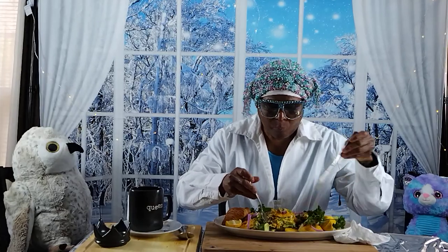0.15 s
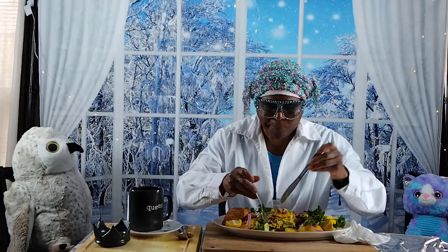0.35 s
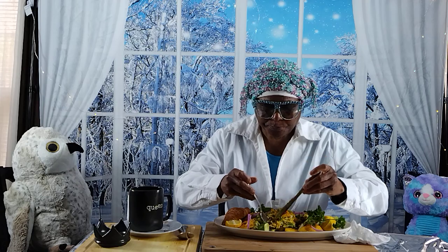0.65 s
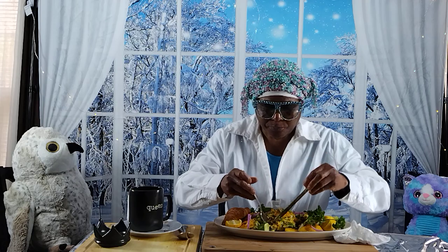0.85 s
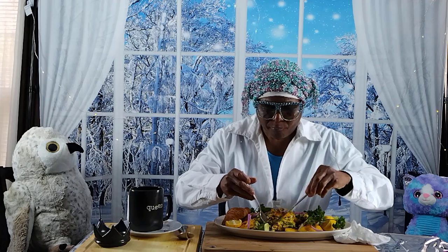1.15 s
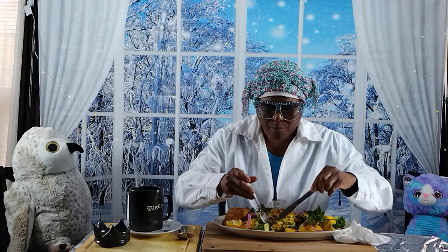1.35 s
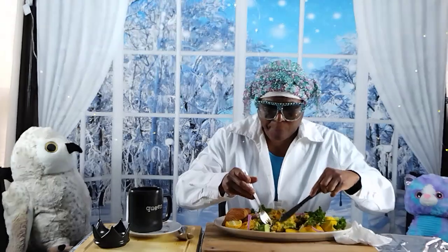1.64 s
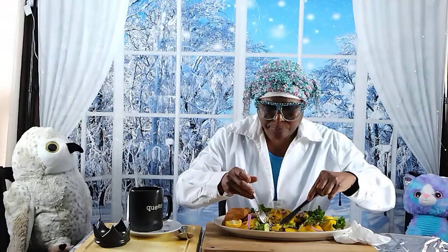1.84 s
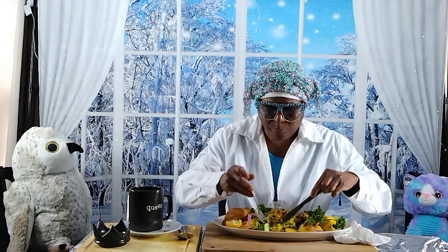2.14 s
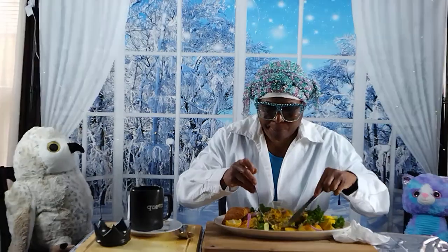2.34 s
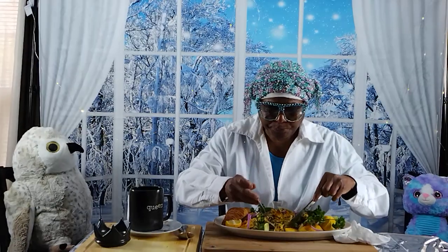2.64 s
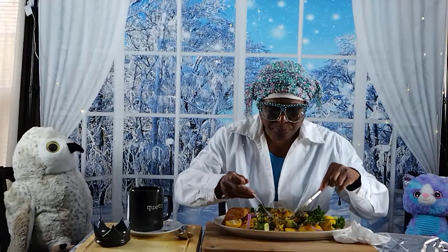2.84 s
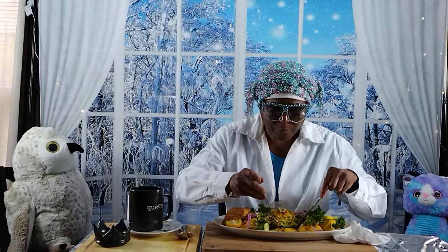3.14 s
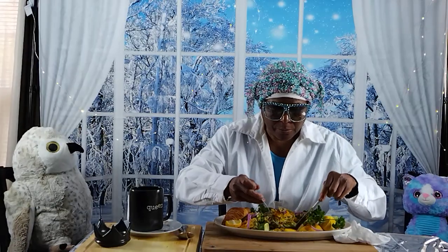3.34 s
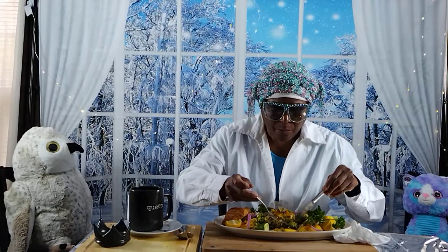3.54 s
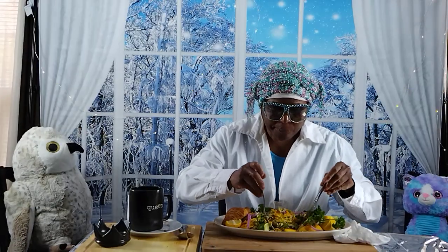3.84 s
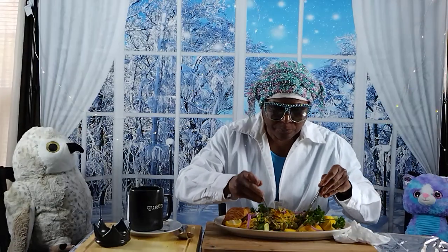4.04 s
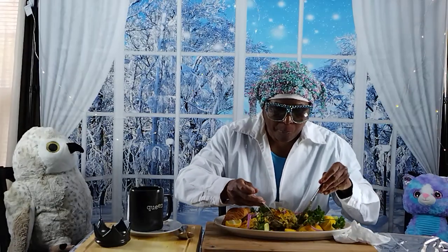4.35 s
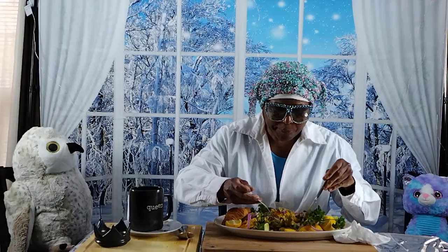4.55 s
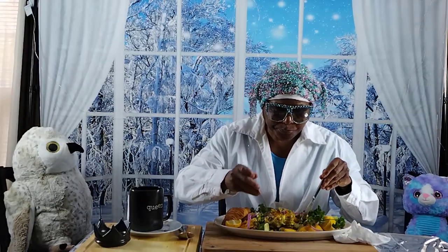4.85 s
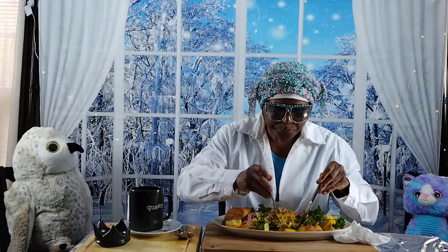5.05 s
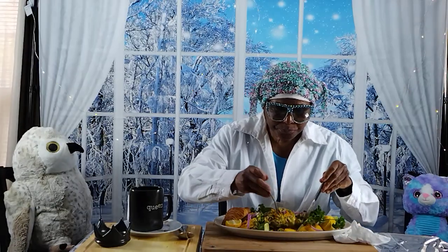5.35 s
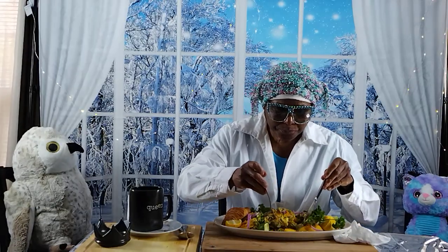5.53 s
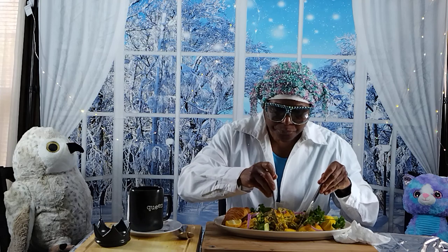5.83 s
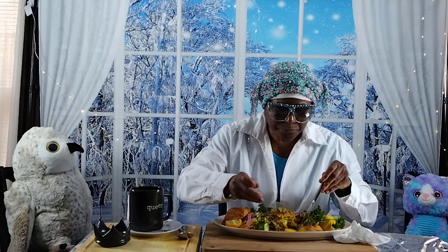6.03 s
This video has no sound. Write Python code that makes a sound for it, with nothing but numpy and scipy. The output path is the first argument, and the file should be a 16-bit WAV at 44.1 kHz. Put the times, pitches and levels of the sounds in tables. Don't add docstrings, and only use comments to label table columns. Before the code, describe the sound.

Knife and fork clink, tap and faintly scrape on a food-laden china plate in a small reverberant room, over a low soft air hush.

```python
import sys
import numpy as np
from scipy import signal
from scipy.fft import rfft, irfft, next_fast_len
from scipy.io import wavfile
from scipy.ndimage import uniform_filter1d, minimum_filter1d

SR = 44100
rng = np.random.default_rng(int(sys.argv[2]) if len(sys.argv) > 2 else 0)


def wav_out(sig):
    wavfile.write(sys.argv[1], SR, np.round(np.clip(np.atleast_2d(sig).T, -1, 1) * 32767).astype(np.int16))


def volts(x):
    e = np.asarray(x, float) / 20
    return 10 ** e


N = 272934
SPAN = 2 ** 15
HZ = np.fft.rfftfreq(SPAN, 1 / SR)
STEADY_TOP_HZ = 14350


# [f/Hz, bandwidth/Hz, level/dB]
RIM = [(270, 180, -27.5), (373, 40, -16.0), (950, 31, -17.5), (522, 120, -18.5), (1147, 18, -17.0),
       (1674, 71, -10.5), (2008, 57, -13.5), (2256, 66, -13.5), (2498, 52.2, -11.0), (3023, 37, -2.5),
       (3584, 24.2, -9.0), (3820, 38, -8.0), (4380, 39, -13.0), (4616, 19, -15.0), (4930, 45, -22.0),
       (5370, 55, -19.5), (6120, 25, -20.5), (6550, 36, -17.5), (6387, 35, -17.5), (7110, 160, -16),
       (8610, 32.15, -30.5), (9320, 38.3, -15), (10170, 67, -29), (10874, 97, -26.5), (11490, 83, -38.5),
       (12900, 71.7, -44), (13710, 52, -35.5)]
# [t/s, peak level/dB, left-right/dB, contact/ms]
RIM_BLOWS = [
    (2.5771, -40, -2.5, 0.73),
    (2.5784, -18.5, -1, 2.46),
    (2.5895, -26, -4.5, 6.8),
]
# [f/Hz, bandwidth/Hz, level/dB]
RIM_DIPS = [(5000, 242, -9.5), (8500, 538, -16), (10540, 300, -4), (12000, 900, -31)]


def rim(out, space):
    strike(out, space, RIM, RIM_BLOWS, RIM_DIPS, damp_hz=70, click_db=-40, low_hz=230, high_hz=19000, room_db=5.5)


# [f/Hz, bandwidth/Hz, level/dB]
BASE = [(274, 26, -9.5), (510, 17, -18.5), (808, 19, -1.0), (1177, 29, -0.5), (1334, 23, 1.5),
        (1520, 31, -0.5), (1740, 28, 2), (2274, 36, 7.5), (2316, 15.0, 4.5), (2510, 17, 1.0),
        (3073, 107, -2), (4060, 210, -10), (5270, 62, -13.5), (5960, 14, -7.5), (7600, 140, -21),
        (8150, 62, -52), (10040, 37, -21.5)]
# [t/s, peak level/dB, left-right/dB, contact/ms]
BASE_BLOWS = [(4.066, -25, -0.5, 2.2)]
# [f/Hz, bandwidth/Hz, level/dB]
BASE_DIPS = [(4700, 260, 7.5), (6860, 230, -14), (9100, 500, -18), (11800, 1900, -26)]


def base(out, space):
    strike(out, space, BASE, BASE_BLOWS, BASE_DIPS, damp_hz=50, click_db=-44, low_hz=230, high_hz=8500, room_db=3.1)


# [f/Hz, bandwidth/Hz, level/dB]
DIPS = [(4550, 250, -19), (8150, 500, -16), (10000, 293.5, -7), (12300, 349, -4)]
# [f/Hz, bandwidth/Hz, level/dB]
TINES = [(1850, 30, 12.5), (2777, 15, -1), (2890, 47, -8.5), (3940, 22, -7.5), (5500, 740, -15.5),
         (7100, 120, -1.5), (8800, 220, -6), (10000, 82, -5.5), (11200, 71, -9), (10770, 24, -7),
         (11700, 57, -10), (12000, 56, -41), (13540, 230, -7.5)]
# [t/s, peak level/dB, left-right/dB, contact/ms]
TINE_BLOWS = [(5.209, -43.5, 1, 4.2), (5.886, -34.5, 2.6, 1.23)]


def tines(out, space):
    strike(out, space, TINES, TINE_BLOWS, DIPS, damp_hz=50, click_db=-28, low_hz=1500, high_hz=17000, room_db=3.2)


# [f/Hz, bandwidth/Hz, level/dB]
NUDGE = [(1900, 67, 1), (2700, 83, -3), (3750, 100, -20), (5760, 300, -17), (6900, 140, -7),
         (8900, 500, -19), (11100, 300, -21), (13400, 700, -23)]
# [t/s, peak level/dB, left-right/dB, contact/ms]
NUDGE_BLOWS = [(3.986, -52.5, 1.5, 1.9)]


def nudge(out, space):
    strike(out, space, NUDGE, NUDGE_BLOWS, DIPS, damp_hz=50, click_db=-30, low_hz=1500, high_hz=15000, room_db=4)


# [f/Hz, bandwidth/Hz, level/dB]
CROSSED = [(1810, 62, -10.5), (2615, 110, -15), (3830, 126, -24.5), (4620, 25, -30), (5105, 88, -27),
           (5730, 94.6, -17), (7100, 26.4, -7), (7800, 39, -15), (8290, 39, -19.5), (9500, 119.8, -14),
           (11070, 34, -10.5), (11800, 49, -31), (12950, 75, -15.5), (13420, 32.9, -13)]
# [t/s, peak level/dB, left-right/dB, contact/ms]
CROSSED_BLOWS = [
    (2.0245, -27, .5, 2.42),
    (2.0294, -35, 7.3, 0.79),
    (2.1594, -56, 1, 2.1),
]
# [f/Hz, bandwidth/Hz, level/dB]
CROSSED_DIPS = [(4600, 280, -26), (8900, 150, -7), (12300, 200, -2)]


def crossed(out, space):
    strike(out, space, CROSSED, CROSSED_BLOWS, CROSSED_DIPS, damp_hz=60, click_db=-32, low_hz=1500, high_hz=17000,
           room_db=4)


# [f/Hz, bandwidth/Hz, level/dB]
EDGE = [(1720, 89, 1), (2740, 84, 1.5), (3900, 200, -17), (5400, 250, -6), (6300, 450, -8),
        (7500, 370, -5.5), (9500, 400, 1), (10700, 400, 1.5), (13300, 400, -4), (12200, 400, 2),
        (14000, 300, -11)]
# [t/s, peak level/dB, left-right/dB, contact/ms]
EDGE_BLOWS = [(1.0015, -34.5, 0.5, 0.92), (1.01, -56, 1.0, 0.52)]


def edge(out, space):
    strike(out, space, EDGE, EDGE_BLOWS, DIPS, damp_hz=100, click_db=-22, low_hz=1500, high_hz=17000, room_db=.7)


# [f/Hz, bandwidth/Hz, level/dB]
TIP = [(1760, 170, -11), (3800, 180, -13), (5348, 1600, -20.5), (6280, 530, -10), (7600, 201.3, -5.5),
       (9750, 830, -5), (11250, 227, 2), (12290, 560, -24), (13100, 270, 1)]
# [t/s, peak level/dB, left-right/dB, contact/ms]
TIP_BLOWS = [(1.866, -54, 1.5, 1.7), (1.8711, -42, -1.4, 1.2)]


def tip(out, space):
    strike(out, space, TIP, TIP_BLOWS, DIPS, damp_hz=120, click_db=-24, low_hz=1400, high_hz=14000, room_db=4)


# [f/Hz, bandwidth/Hz, level/dB]
HEEL = [(1900, 18, -3.5), (4100, 10, -2), (5320, 120, -34), (5800, 48, -15), (7625, 36, -7),
        (9345, 96, -4.5), (11000, 40, -3.5), (12000, 35, 0), (12070, 200, -10.5), (13020, 60, -15.5),
        (13400, 67, -6)]
# [t/s, peak level/dB, left-right/dB, contact/ms]
HEEL_BLOWS = [(2.205, -44.5, -.5, 4.205)]


def heel(out, space):
    strike(out, space, HEEL, HEEL_BLOWS, DIPS, damp_hz=60, click_db=-30, low_hz=1500, high_hz=15000, room_db=2.05)


# [f/Hz, bandwidth/Hz, level/dB]
FLAT = [(1760, 66, 8), (3150, 43, 4.5), (5300, 480, -5.5), (7000, 420, -6.5), (9750, 1200, -7.5),
        (10940, 480, -4.5), (12700, 800, -8.5), (14100, 500, -8.5)]
# [t/s, peak level/dB, left-right/dB, contact/ms]
FLAT_BLOWS = [(4.2782, -49, 0.27, 1.3)]


def flat(out, space):
    strike(out, space, FLAT, FLAT_BLOWS, DIPS, damp_hz=120, click_db=-20, low_hz=1400, high_hz=15000, room_db=8)


def strike(out, space, resonances, rows, dips, damp_hz, click_db, low_hz, high_hz, room_db):
    t_ms = np.arange(SPAN // 16) / SR * 1000
    body = modes(resonances, damp_hz, share=0.01216) + volts(click_db)
    body = body * band_edge(HZ / high_hz) * band_edge(-low_hz / (HZ + 1))
    sent = volts(room_db) * lacking(dips)
    for s, db, pan_db, contact_ms in rows:
        u = t_ms / (contact_ms / 4)
        force = u * np.exp(-u) * rng.standard_normal(len(t_ms))
        sharp = db > -47 and high_hz > 15900
        add(out, s, db + 3.5, pan_db, sent, force, body, space, sharp)


def band_edge(x):
    return 1 / (1 - x * x + 1.4j * x) ** 2


def modes(table, damp_hz, share):
    c, w, db = np.transpose(table)[..., None]
    w = w + damp_hz + share * c
    sign = (-1.) ** np.arange(len(table))[:, None]
    return np.sum(sign * volts(db) * 1j * HZ * w / (c * c - HZ * HZ + 1j * HZ * w), axis=0)


def lacking(dips):
    return volts(sum(deep_db * np.exp(-(2 * (HZ - hz) / w) ** 4) for hz, w, deep_db in dips))


def add(out, s, db, pan_db, sent, force, response, space, sharp=False):
    lead, margin = 512, 8
    push = rfft(np.pad(force, (lead, 0)), SPAN)
    push = push / np.sqrt(np.abs(uniform_filter1d(np.abs(push) ** 2, size=120)))
    direct = rfft(irfft(push)[lead - margin:SPAN // 2], SPAN) * response
    direct = direct * volts(db) / np.abs(irfft(direct)).max()
    top = volts(-50 * (HZ > STEADY_TOP_HZ))
    lag_ms = .014
    sides = volts([[pan_db / 2], [-pan_db / 2]]) * np.exp([[0], [-2j * np.pi]] * HZ * lag_ms / 1000)
    if not sharp:
        sides = sides * top
    early, tones = space
    answer = sent * top * (volts(-2.5) * early + room(tones))
    out[:, round(s * SR) - margin:][:, :SPAN] += irfft(direct * (sides + answer))


# [t/s, peak level/dB, f/Hz]
TICKS = [(0.785, -60.5, 2700), (.912, -63, 7500), (1.407, -73, 6300), (1.474, -62, 2700), (1.53, -53, 2930),
         (1.623, -68, 8100), (3.324, -69, 7900), (3.342, -63, 7360), (3.366, -63, 7900), (3.393, -72, 7420),
         (3.43, -73, 7500), (3.537, -69, 4770), (5.335, -58.5, 1770), (6.052, -65.5, 3800)]


def ticks(out, space):
    for s, db, hz in TICKS:
        touch(out, space, s, db, hz, width_hz=410 + 0.096 * hz, ms=4)


# [t/s, peak level/dB, f/Hz]
SNAPS = [(.915, -54, 9700), (.99, -55, 7600), (1.398, -78, 10500), (1.529, -62, 5000), (1.53, -54, 8900),
         (3.278, -75, 10300), (3.567, -75, 11300), (3.601, -63.5, 8620)]


def snaps(out, space):
    for s, db, hz in SNAPS:
        touch(out, space, s, db, hz, width_hz=0.31 * hz, ms=4)


# [t/s, peak level/dB, f/Hz, length/ms]
SQUEAKS = [(.02, -84, 4700, 200), (0.967, -60.5, 7600, 18), (1.508, -58, 2600, 20),
           (3.285, -73.5, 7140, 19), (3.4, -85, 7500, 22), (3.604, -69.5, 7100, 25)]


def squeaks(out, space):
    for s, db, hz, ms in SQUEAKS:
        touch(out, space, s, db, hz, width_hz=520, ms=ms)


# [t/s, peak level/dB, f/Hz, length/ms]
HISSES = [
    (.76, -73.5, 7000, 70),
    (1.81, -72.5, 9500, 50),
    (2.858, -76, 11200, 42),
    (6.044, -66, 5170, 38),
]


def hisses(out, space):
    for s, db, hz, ms in HISSES:
        touch(out, space, s, db, hz, width_hz=4400 * (6000 / hz), ms=ms)


def touch(out, space, s, db, hz, width_hz, ms):
    u = np.arange(SPAN // 4) / SR / (ms / 1000)
    puff = np.sin(np.pi * np.clip(u, 0, 1) ** 0.69) * rng.standard_normal(len(u))
    response = modes([(hz, width_hz, 0)], damp_hz=0, share=0) ** 2
    add(out, s, db + 3.0, 0, volts(-1.0), puff, response, space)


# [t/s, peak level/dB, f/Hz, length/cycles]
THUMPS = [
    (1.92, -50.5, 72, 4),
    (2.05, -54.5, 33, 2.5),
    (2.621, -53.5, 80, 4.4),
    (5.851, -61.5, 96.6, 12),
    (6.052, -68.5, 75, 15),
]


def thumps(out):
    t = np.arange(SPAN // 2) / SR
    for s, db, hz, cycles in THUMPS:
        swell = np.sin(np.pi * np.clip(t * hz / cycles, 0, 1))
        out[:, round(s * SR):][:, :len(t)] += volts(db) * np.sin(2 * np.pi * hz * t) * swell


# [delay/ms, left level/dB, right level/dB]
ECHOES = [(3.77, -4.5, -7), (5.93, -3.5, -10.5), (10.264, -5.5, -0.5), (15.32, -8, -9), (20.98, -7.5, -4.5)]


def echoes():
    ms, *dbs = np.transpose(ECHOES)[..., None]
    late = (ms + rng.normal(0, 0.21, (2, len(ECHOES), 1))) / 1000
    return np.sum(volts(np.array(dbs)) * np.exp(-2j * np.pi * HZ * late), axis=1)


# [f/Hz, level/dB, decay by 60 dB/s]
STANDING = [(262.8, -27.5, 0.3), (419, -30, 0.33), (508, -24, 0.36), (842.5, -29, 0.11), (922, -36, 0.26),
            (1089.3, -26, 0.42), (1133, -29.5, 0.26), (1305, -33.5, 0.22), (1594, -36, .3), (1970, -33, .3),
            (2910, -36.5, 0.4), (3120, -32.5, 0.18), (3735, -35.5, 0.38)]


def standing(swell_ms=12, beat_db=4):
    t = np.arange(SPAN // 2) / SR
    hz, db, t60 = np.transpose(STANDING)[..., None]
    skew = rng.normal(0, .4, (2, len(STANDING), 1))
    beats = np.sin(2 * np.pi * rng.uniform(12, 30, hz.shape) * t + skew)
    level = volts(db + beat_db * beats - 60 * t / t60)
    tones = level * np.sin(2 * np.pi * hz * t + skew + beats / 2)
    swell = 1 - np.exp(-1000 * t / swell_ms)
    return rfft(volts(-14) * tones.sum(axis=1) * swell, SPAN)


# [f/Hz, decay by 60 dB/s]
WALLS = [(300, 0.143), (800, 0.38), (2000, 0.29), (5500, 0.32), (9000, 0.21), (14000, 0.21)]


def room(tones, gap_ms=2.517, swell_ms=4):
    hz, t, z = signal.stft(rng.standard_normal((2, SPAN // 2)), SR, nperseg=256)
    decay = volts(-60 * t / along(WALLS, hz)[:, None])
    tail = signal.istft(z * decay, SR, nperseg=256)[1][:, :SPAN // 2]
    ms = np.arange(SPAN // 2) / SR * 1000
    tail = tail * (1 - np.exp(-np.clip(ms - gap_ms, 0, None) / swell_ms))
    return paired(rfft(tail / np.linalg.norm(tail[0]), SPAN), HZ, extra=0.18) + tones


# [f/Hz, left-right likeness]
ALIKE = [(40, 1), (80, 0.93), (160, 0.842), (300, 0.588), (640, .1), (1400, 0.045), (3000, 0.011)]


def paired(two, hz, extra):
    turn = np.arccos(np.clip(along(ALIKE, hz) + extra, 0, 1)) / 2
    mid, side = two * [np.cos(turn), np.sin(turn)]
    return np.array([mid + side, mid - side])


def along(points, hz):
    f, v = np.transpose(points)
    return np.interp(np.log(hz + 1), np.log(f + 1), v)


# [f/Hz, density level/dB]
HUSH = [(15, -14.5), (30, -6), (65, -1), (120, -6.5), (250, -12), (500, -14.5), (800, -18), (1000, -21),
        (1400, -21), (2000, -25.5), (3200, -31), (5000, -34.5), (8200, -41), (8900, -45.5), (14300, -45)]
# [f/Hz, bandwidth/Hz, level/dB]
HUMS = [(179, 25, 3), (246.5, 35, 3), (610, 70, 5.5), (1003, 110, 6.5)]


def hush():
    z = signal.stft(rng.standard_normal((2, N + SR)), nperseg=1024)[2]
    field = uniform_filter1d(rng.standard_normal(z.shape[1:]), size=8, axis=0)
    field = uniform_filter1d(field, size=8, axis=1)
    noise = signal.istft(z * volts(.8 * field / field.std()), nperseg=1024)[1]
    m = next_fast_len(N)
    hz = np.fft.rfftfreq(m, 1 / SR)
    lifted = sum(db * np.exp(-(2 * (hz - c) / w) ** 2) for c, w, db in HUMS)
    colour = volts(along(HUSH, hz) + lifted - 18 * (hz > STEADY_TOP_HZ)) * (hz > 15)
    air = irfft(paired(rfft(noise[:, :m]), hz, extra=0) * colour, m)[:, :N]
    return volts(-62.5 + 2.5) * air / air.std()


def scene():
    out = np.zeros((2, N + SPAN))
    space = echoes(), standing()
    for contact in (rim, base, tines, nudge, crossed, edge, tip, heel, flat, ticks, snaps, squeaks, hisses):
        contact(out, space)
    thumps(out)
    return out[:, :N] + hush()


def masked(x, below_db=-21, deep_db=-25, waver_db=2):
    hz, _, z = signal.stft(x, SR, nperseg=1024)
    power = np.abs(uniform_filter1d(np.mean(np.abs(z) ** 2, axis=0), size=7, axis=0))
    near = -minimum_filter1d(-power, size=110, axis=0)
    luck = uniform_filter1d(rng.standard_normal(power.shape), size=2, axis=0)
    luck = uniform_filter1d(luck, size=8, axis=1)
    luck = luck / luck.std()
    covered = power < volts(2 * (below_db + waver_db * luck)) * near
    thin = (luck > 2.0) & (hz > 6500)[:, None]
    weak = (covered | thin) & ((hz > 3200) & (hz < STEADY_TOP_HZ))[:, None]
    streaks_db = 3 * luck * (hz > 8600)[:, None]
    return signal.istft(z * volts(deep_db * weak - streaks_db), SR, nperseg=1024)[1][:, :N]


def roll_off(x):
    return signal.sosfilt(signal.butter(12, 16520, fs=SR, output="sos"), x)


# [f/Hz, level/dB]
TOP = [(14200, -1.5), (15000, -3.5), (15900, -13), (16500, -48)]


def record(dry):
    m = next_fast_len(N + 4096)
    edge_gain = volts(along(TOP, np.fft.rfftfreq(m, 1 / SR)))
    cut = irfft(rfft(dry, m) * edge_gain, m)[:, :N]
    return roll_off(masked(cut))


dry = scene()
out = record(dry)
wav_out(out)
```